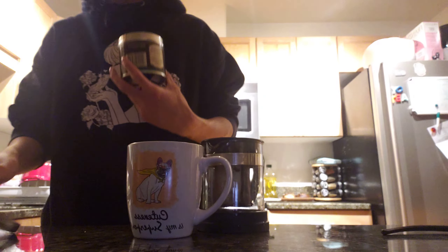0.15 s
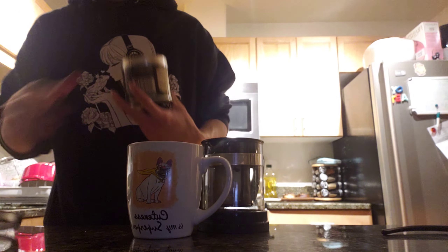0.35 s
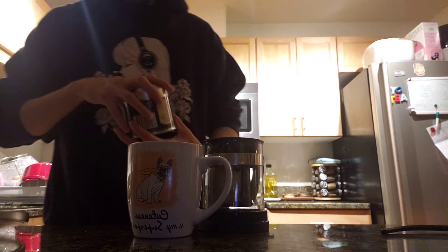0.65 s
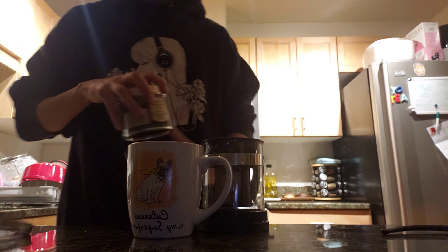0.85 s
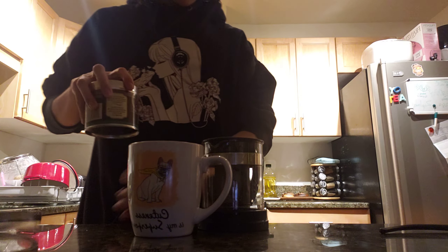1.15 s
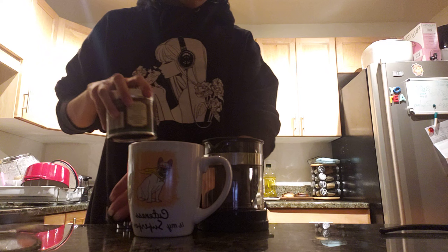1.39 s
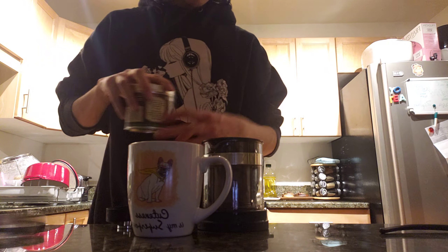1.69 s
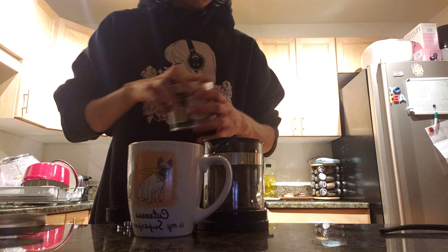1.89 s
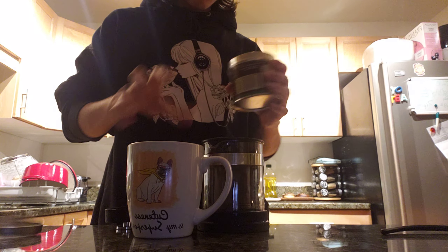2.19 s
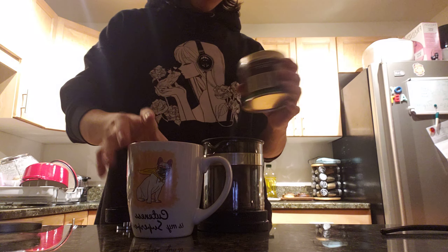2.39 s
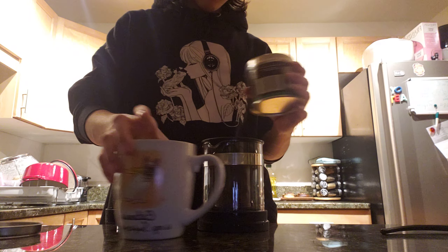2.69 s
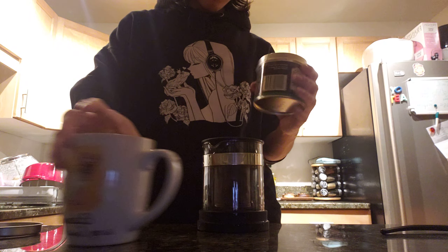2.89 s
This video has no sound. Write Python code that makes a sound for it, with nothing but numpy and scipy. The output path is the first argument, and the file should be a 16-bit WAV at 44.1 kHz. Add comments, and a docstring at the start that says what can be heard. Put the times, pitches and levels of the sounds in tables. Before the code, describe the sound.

A tin's thin metal lid hits a stone counter at 0.15 seconds with a bright clank, bounces and lands again at 0.2. It wobbles on its rim, slapping about seven times a second, then faster, chattering flat by 2.8. Faint hollow knocks come near 0.6, dull bumps and a thin rustle around 1.3-1.45. From 2.7 a dragged mug moans with a faint squeak. Close, slightly left, small lively kitchen.

```python
"""First a tin's metal lid drops on a stone kitchen counter and bounces once, near the left microphone.
It wobbles on its rim ever faster until it chatters flat: random tiny impacts ring a thin metal sheet.
Meanwhile something is set down: dull bumps and thin rustles of shaped noise, hollow knocks of sine.
At the end a dragged mug sings in wavering tones, with a thin squeak of its foot.
All this is in a small room, whose echoes are decaying noise, over a quiet background of soft noise."""
import sys
import numpy as np
from scipy import signal
from scipy.fft import rfft, irfft, next_fast_len
from scipy.io import wavfile
from scipy.ndimage import uniform_filter1d, map_coordinates

SR = 44100
rng = np.random.default_rng(int(sys.argv[2]) if len(sys.argv) > 2 else 0)


def unload_audio(sound):
    """Save the sound as a 16-bit wav file, at the path given as the first command line argument."""
    columns = np.transpose(np.atleast_2d(sound))
    # keep every value between -1 and 1, then stretch to whole-number steps
    steps = np.round(np.clip(columns, -1, 1) * 32767)
    wavfile.write(sys.argv[1], SR, steps.astype(np.int16))


N = 134505
T = np.arange(N) / SR  # time of each sample [s]


def amp(db):
    """Decibels to an amplitude factor."""
    return 10 ** (np.asarray(db) / 20)


def unit(x):
    """Scale to an rms of 1."""
    return x / np.sqrt(np.mean(x ** 2) + 1e-20)


def along(points, hz):
    """Read (pitch [Hz], value) points on a logarithmic pitch axis."""
    point_hz, value = np.transpose(points)
    return np.interp(np.log(hz + 1), np.log(point_hz + 1), value)


def curve(rows):
    """Gain per sample from (time [s], level [dB]) points, practically silent outside them."""
    return amp(np.interp(T, *np.transpose(rows), left=-120, right=-120))


def waver(rate):
    """A smooth random curve through `rate` random points per second."""
    return map_coordinates(rng.standard_normal(int(N * rate / SR) + 4), [T * rate])


def through(x, response):
    """What comes out when x excites something with this response."""
    return signal.fftconvolve(x, response)[:N]


def colour(x, points, size=4096):
    """Filter with the given spectrum and unit energy; it never sounds ahead of its input."""
    cepstrum = irfft(np.log(amp(along(points, np.fft.rfftfreq(size, 1 / SR)))))
    # folding the second half onto the first makes the filter minimum phase
    cepstrum[1:size // 2] *= 2
    cepstrum[size // 2 + 1:] = 0
    response = irfft(np.exp(rfft(cepstrum)))
    return through(x, response / np.linalg.norm(response))


def fade(t, t60):
    """Exponential decay that falls 60 dB in t60 seconds."""
    return np.exp(-np.log(1000) * np.maximum(t, 0) / t60)


def burst(start, rise, hold, t60):
    """Attack, hold and release, all in seconds."""
    return np.clip((T - start) / rise, 0, 1) * fade(T - start - hold, t60)


def mode(hz, t60):
    """A damped vibration of unit energy with a soft start, at most a second long."""
    tone = np.sin(2 * np.pi * hz * T) * fade(T, t60)
    response = (tone * (1 - np.exp(-T * hz)))[:SR]
    return response / np.linalg.norm(response)


def width_t60(width_hz):
    """Decay time of a mode from the width of its resonance: wide ones die faster."""
    return np.log(1000) / (np.pi * width_hz)


def contacts(rate, spread_db):
    """Random tiny impacts of uneven size, `rate` per second on average, rms 1."""
    hits = (rng.random(N) < rate / SR) * rng.choice([-1, 1], N)
    size = amp(spread_db * np.clip(rng.standard_normal(N), -2, 2))
    return unit(hits * size)


def place(x, lead_s, pan_db):
    """A source that reaches the left microphone earlier and louder."""
    m = next_fast_len(N + 4096)
    side = np.array([[1], [-1]])  # left, right: each takes half the lead
    shift = np.exp(1j * np.pi * side * lead_s * np.fft.rfftfreq(m, 1 / SR))
    return irfft(rfft(x, m) * shift, m)[:, :N] * amp(side * pan_db)


# spectrum of the quiet background: (pitch [Hz], relative level [dB])
AIR_COLOUR = [(25, -27), (60, -12), (130, -6), (290, 6), (420, -3.5), (620, -8.5), (1100, -27.5),
              (4000, -22), (8000, -36), (16000, -37)]
AIR_DB = -64.5


def background():
    """Soft coloured noise, partly shared between the microphones."""
    common = rng.standard_normal(N)
    ears = [colour(common + 0.78 * rng.standard_normal(N), AIR_COLOUR) for _ in range(2)]
    return amp(AIR_DB) * np.array(ears)


# how long the room rings at each pitch: (pitch [Hz], time to fall 60 dB [s])
ROOM_DECAY = [(150, 0.17), (1000, 0.88), (4000, 0.43), (8000, 0.3), (15000, 0.37)]
ROOM_DB, WALLS_DB = -6.5, -9  # diffuse tail, early echoes


def room(x):
    """Nearby cabinets return ten early echoes, and the kitchen's diffuse tail swells in and decays."""
    hz, t, noise = signal.stft(rng.standard_normal(SR * 3 // 4), SR, nperseg=256)
    decay = fade(t, along(ROOM_DECAY, hz)[:, None])
    tail = signal.istft(noise * decay, SR, nperseg=256)[1]
    tail *= np.clip(T[:len(tail)] / .015, 0, 1)
    walls = np.zeros(len(tail))
    walls[(rng.uniform(.002, .025, size=10) * SR).astype(int)] = rng.choice([-1, 1], size=10)
    tail = amp(ROOM_DB) * tail / np.linalg.norm(tail)
    return through(x, tail + amp(WALLS_DB) * walls / np.linalg.norm(walls))


# dull bumps on the counter: (time [s], level [dB], time to fall 60 dB [s])
BUMPS = [(1.298, -39.5, 0.076), (1.33, -39.5, 0.16), (1.44, -47.5, 0.22)]
# their spectrum: (pitch [Hz], relative level [dB])
BUMP_COLOUR = [(25, -33), (45, -9), (62, 6), (120, 1.5), (250, -2), (700, 0.5), (3000, -23), (9000, -42)]


def bumps():
    """Short noise bursts, mostly low: something is set down on the counter."""
    push = sum(amp(db) * burst(s, 0.0026, 0.0014, t60) for s, db, t60 in BUMPS)
    return colour(push * rng.standard_normal(N), BUMP_COLOUR)


# soft hollow knocks of the tin in the hands: (time [s], pitch [Hz], level [dB])
KNOCKS = [(0.577, 158, -49.5), (0.701, 162, -46)]


def knocks():
    """The hollow tin answers each knock with one low, quickly fading tone."""
    return sum(amp(db) * burst(s, 0.0036, 0.0045, 0.12) * np.sin(2 * np.pi * hz * (T - s))
               for s, hz, db in KNOCKS)


# thin high rustles: (time [s], level [dB], time to fall 60 dB [s])
RUSTLES = [(1.33, -57, 0.11), (1.439, -40, 0.11), (1.889, -52, 0.028)]
# their spectrum: (pitch [Hz], relative level [dB])
RUSTLE_COLOUR = [(3000, -50), (9000, -15), (10500, -2), (12300, 0), (13800, -9), (16000, -22)]


def rustles():
    """Bursts of many tiny impacts, filtered to leave the high treble."""
    strength = sum(amp(db) * burst(s, 0.0029, 0.021, t60) for s, db, t60 in RUSTLES)
    return colour(strength * contacts(2000, 5.1), RUSTLE_COLOUR)


MUG_STEADY = .55  # steady part of each main ring, beside its random part


def wavering_ring(phase, width_hz):
    """A tone whose strength and phase wander at random; phase counts in turns."""
    wander = waver(width_hz * 2) * .5 + .5j * waver(width_hz * 2)
    return unit(np.real((MUG_STEADY + wander) * np.exp(2j * np.pi * phase)))


# the drag: (time [s], main ring's pitch [Hz], main level [dB], lower ring's level [dB]),
# levels relative to each other
DRAG = [(2.7, 696, -70, -73), (2.731, 704, -42.5, -60), (2.755, 669.4, -39, -57), (2.818, 672, -45, -53),
        (2.849, 694, -40, -42), (2.893, 690.5, -39, -63), (2.925, 693, -40, -46.5), (2.968, 702, -57, -45),
        (2.996, 711, -38, -50), (3.05, 707, -58, -65)]
# the mug's weaker modes: (pitch [Hz], width [Hz], relative level [dB])
MUG_MODES = [(648, 136, 11), (898, 18, 8), (960, 120, 7)]
# thin squeak of the mug's foot: (time [s], level [dB])
SQUEAK = [(2.8, -68), (2.91, -64), (3.05, -72.5)]
SLIPS_PER_S, DRAG_DB, MUG_SIDE_DB, MUG_JUDDER_DB = 580, -4, -6, 1.2
MUG_LOW_HZ, MUG_WIDTH_HZ = 373, 49
SQUEAK_HZ, SQUEAK_WIDTH_HZ = 11900, 230


def mug():
    """The mug's foot sticks and slips on the stone; its two main rings swell and fade separately."""
    s, hz, main_db, low_db = np.transpose(DRAG)
    body = sum(amp(db) * mode(f, width_t60(width)) for f, width, db in MUG_MODES)
    slips = unit(through(contacts(SLIPS_PER_S, 1.9), body))
    main_phase = np.cumsum(np.interp(T, s, hz)) / SR
    main = wavering_ring(main_phase, MUG_WIDTH_HZ) + amp(MUG_SIDE_DB) * slips
    low = wavering_ring(MUG_LOW_HZ * T, MUG_WIDTH_HZ)
    both = main * curve(np.c_[s, main_db]) + low * curve(np.c_[s, low_db])
    squeak_mode = mode(SQUEAK_HZ, width_t60(SQUEAK_WIDTH_HZ))
    squeak = curve(SQUEAK) * unit(through(rng.standard_normal(N), squeak_mode))
    judder = amp(DRAG_DB + MUG_JUDDER_DB * waver(90))
    return place(judder * both + squeak, .0001, 0.62)


HUM_HZ, HUM_DB = 215.5, -64


def hum():
    """A low ring under the rolling lid: noise through one resonance."""
    ring = unit(through(rng.standard_normal(N), mode(HUM_HZ, 0.17)))
    return amp(HUM_DB) * ring * burst(LANDINGS[0][0], 0.024, 2.47, 2.7)


SHEET_WIDTH = .65  # part of the sheet's noise that differs between the microphones


def wide():
    """Noise for the dense sheet modes, partly shared between the microphones."""
    common = np.sqrt(1 - SHEET_WIDTH ** 2) * rng.standard_normal(N)
    return common + SHEET_WIDTH * rng.standard_normal((2, N))


def shimmer(force, t60, length):
    """The sheet's dense short ring: noise that follows the decaying energy of the force."""
    decay = fade(T[:length], t60) ** 2
    energy = np.abs(through(force ** 2, decay / decay.sum()))
    return np.sqrt(energy) * wide()


# the lid's long modes: (pitch [Hz], relative level [dB], time to fall 60 dB [s])
LID_MODES = [(610, -28, .3), (700, -28, .3), (884, -23, .25), (1185, -30, .22), (1912, -13.8, .23),
             (2420, -15.5, .55), (2769, -16.5, .14), (2885, -16, .19), (3280, -20, .14), (3466, -13, .2),
             (3732, -19.5, .15), (4280, -17, .067), (4528, -19.5, .07)]
RING_WAVER_PER_S, RING_BEND_RAD, RING_WAVER_DB = 35, .42, 2.5


def ringing(force):
    """Long modes, each wavering in phase and level as the contact point travels round the rim."""
    total = np.zeros(N)
    for hz, db, t60 in LID_MODES:
        ring = signal.hilbert(through(force, mode(hz, t60)), next_fast_len(N))[:N]
        level = amp(db + RING_WAVER_DB * waver(RING_WAVER_PER_S))
        bend = np.exp(1j * RING_BEND_RAD * waver(RING_WAVER_PER_S))
        total += level * np.real(ring * bend)
    return total


# single sharp rim taps, mostly as the lid settles: (time [s], relative strength [dB])
TAPS = [(0.579, -15), (0.6221, -5.5), (.7265, -15), (.975, -12), (1.8022, -10.5), (1.8445, -15.5),
        (1.888, -6), (1.9985, -10), (2.0185, -13.5), (2.0716, -9.5), (2.0952, -8.5), (2.12, -9.5),
        (2.163, -14.5), (2.194, -11.5), (2.2869, -13.5), (2.3517, -10.5), (2.3877, -7), (2.4137, -14),
        (2.4322, -8.5), (2.4618, -2), (2.475, -5), (2.5187, -6.5), (2.541, -8), (2.5536, 1.5),
        (2.576, -7.5), (2.6036, -10.5), (2.627, 0.5), (2.649, -7.5), (2.667, -7), (2.695, 2), (2.7294, -5),
        (2.7678, -8)]


def tap_pulses():
    """Each tap is one very short push on the sheet."""
    taps = np.zeros(N)
    for s, db in TAPS:
        taps[round(s * SR)] = amp(db)
    return taps


# spectrum of a tap: (pitch [Hz], relative level [dB])
TAP_COLOUR = [(40, -45), (900, -17.5), (2000, -24.5), (2750, -9), (3600, -15.5), (4520, 6), (5000, -3),
              (7100, -21.5), (11400, -20.5), (16000, -31.5)]
TAP_DB, TAP_T60_S, TAP_RING_DB = -4.5, 0.05, 5.5  # the last sets the ring against the bare click


def ticks(taps):
    """Each sharp tap is a bare click and a brief bright ring of the sheet."""
    ring = shimmer(taps, TAP_T60_S, SR // 8)
    return amp(TAP_DB) * np.array([colour(taps + amp(TAP_RING_DB) * ear, TAP_COLOUR) for ear in ring])


PATCHY_DB = 3.5


def patchy(x):
    """Each spot on the rim stresses other overtones: a random gain over pitch and time."""
    z = signal.stft(x, nperseg=256)[2]
    field = uniform_filter1d(rng.standard_normal(z.shape[1:]), size=2, axis=0)  # over pitch
    field = uniform_filter1d(field, size=12, axis=1)  # over time
    gain = amp(PATCHY_DB * (unit(field) - 0.12))
    return signal.istft(z * gain, nperseg=256)[1][:, :N]


# the lid's colour while tilted steeply: (pitch [Hz], relative level [dB])
STEEP_COLOUR = [(40, -42), (300, -22.5), (500, -37.5), (900, -15), (1400, -21), (1900, -1.5), (2100, -15.5),
                (2580, -2.5), (3100, -10), (3700, -8.5), (4400, -2.5), (5100, -0.5), (5700, -16.5),
                (6300, -9), (7100, -38.5), (8200, -16), (9700, -31.5), (13500, -25.5), (14800, -49),
                (16000, -22)]
# and when nearly flat: (pitch [Hz], relative level [dB])
FLAT_COLOUR = [(40, -45), (300, -22.5), (500, -29.5), (900, -15.5), (1400, -17.5), (1900, -5), (2100, -19),
               (2600, -2), (2850, -3), (3100, -11.5), (3700, -11.5), (4400, 1), (5100, -2.5), (5700, -19),
               (6300, -11.5), (7100, -34), (8200, -17), (9700, -31), (11400, -19), (13500, -29),
               (14800, -27.5), (16000, -46)]
FLATTEN_START_S, FLATTEN_END_S = 1.1, 2.3
SHEET_T60_S, CRACK = .025, .58  # CRACK: part of bare contact beside the sheet's ring


def clatter(force):
    """Bare contacts and the sheet's dense ring, changing colour as the lid flattens."""
    ring = shimmer(force, SHEET_T60_S, SR // 4)
    sheet = patchy(CRACK * force + np.sqrt(1 - CRACK ** 2) * ring)
    flat = np.clip((T - FLATTEN_START_S) / (FLATTEN_END_S - FLATTEN_START_S), 0, 1)
    return np.array([(1 - flat) * colour(ear, STEEP_COLOUR) + flat * colour(ear, FLAT_COLOUR)
                     for ear in sheet])


# once a turn the rim slaps down: (time [s], relative level [dB], time to fall 60 dB [s])
WOBBLES = [(.302, -32, 0.068), (0.458, -30.5, 0.15), (0.611, -26, 0.042), (0.7589, -26.5, 0.017),
           (0.901, -25, 0.03), (1.035, -25.5, 0.053), (1.1684, -26.5, 0.04), (1.296, -29, 0.16),
           (1.422, -29.5, 0.1), (1.5442, -29, 0.044), (1.66, -30, 0.072), (1.776, -33, 0.06),
           (1.888, -34.5, 0.16), (1.995, -35.5, 0.04), (2.094, -33.5, 0.039), (2.193, -32.5, 0.044),
           (2.2865, -38, 0.087)]
# force of the rim rolling on the stone: (time [s], relative level [dB])
ROLL = [(.2, -92), (.225, -29), (.29, -44.5), (.39, -46.5), (.55, -47), (.68, -43), (.96, -40), (1.12, -48),
        (1.22, -39.5), (1.5, -41), (1.9, -40), (2.68, -38), (2.76, -40.5), (2.81, -81)]
WOBBLE_RISE_S, WOBBLE_HOLD_S = .003, .012
CONTACTS_PER_S, CONTACT_SPREAD_DB = 2500, 4
ROLL_TICKS_PER_S, ROLL_SPREAD_DB, ROLL_WAVER_DB = 380, 3.5, 0.5
LIFT_DB, LIFT_LEAD_S, LIFT_WIDTH_S = -4, 0.042, 0.011


def rim_force():
    """Slaps and rolling are random contacts; the rim unloads shortly before each slap."""
    slaps = sum(amp(db) * burst(s, WOBBLE_RISE_S, WOBBLE_HOLD_S, t60) for s, db, t60 in WOBBLES)
    lift = sum(np.exp(-((T - s + LIFT_LEAD_S) / LIFT_WIDTH_S) ** 2) for s, _, _ in WOBBLES)
    rolling = curve(ROLL) * amp(ROLL_WAVER_DB * waver(38.77) + LIFT_DB * lift)
    slap_force = slaps * contacts(CONTACTS_PER_S, CONTACT_SPREAD_DB)
    return slap_force + rolling * contacts(ROLL_TICKS_PER_S, ROLL_SPREAD_DB)


# the lid hits edge first, its far side follows; it bounces and lands again:
# (time [s], relative level [dB])
LANDINGS = [(.156, -10.5), (0.1603, -20), (0.1835, -31), (0.2018, -10), (.207, -19), (0.2195, -23),
            (.2255, -23)]
LANDING_T60_S, LANDING_HOLD_S = 0.033, 0.0013


def landing_strength():
    """Each landing strikes abruptly and dies away fast."""
    return sum(amp(db) * burst(s, 0.00042, LANDING_HOLD_S, LANDING_T60_S) for s, db in LANDINGS)


# spectrum of a landing: (pitch [Hz], relative level [dB])
LANDING_COLOUR = [(40, -49.5), (150, -25), (900, -18.5), (1400, -24.5), (1900, 1.5), (2100, -17),
                  (2420, -1.5), (2950, -19.5), (3330, 7), (3750, -21.5), (4300, 1), (5200, -4.5),
                  (7100, -22.5), (8200, -3), (9200, -21.5), (10700, -18.5), (13400, -28), (14600, -24),
                  (16000, -27.5)]
LANDING_DB = -3.5


def crash(fall):
    """A landing shakes all the dense sheet modes at once: coloured noise."""
    return amp(LANDING_DB) * np.array([colour(fall * ear, LANDING_COLOUR) for ear in wide()])


CLANK_HZ, CLANK_BEND_RAD, CLANK_DB = 3394, 0.37, -1


def clank(fall):
    """The panel mode that a landing drives hardest: a tone with a wavering phase."""
    tone = unit(np.sin(2 * np.pi * CLANK_HZ * T + CLANK_BEND_RAD * waver(200)))
    return amp(CLANK_DB) * fall * tone


LID_LEAD_S, CLANK_LEAD_S, LID_PAN_DB = 0.0002851, .00018, 2.1


def lid():
    """Landings, rim slaps, rolling and taps all ring the same thin sheet."""
    fall = landing_strength()
    blows = fall * contacts(8100, 6.0)
    force = rim_force()
    taps = tap_pulses()
    ring = ringing(force + amp(-4) * taps + amp(-6.5) * blows)
    sheet = clatter(force) + ticks(taps) + ring + crash(fall)
    return place(sheet, LID_LEAD_S, LID_PAN_DB) + place(clank(fall), CLANK_LEAD_S, LID_PAN_DB) + hum()


def scene():
    """The sources in the kitchen, with its echoes, over its background."""
    near = bumps() + knocks() + rustles() + mug() + lid()
    echoes = np.array([room(near.mean(0)) for _ in near])
    return background() + echoes + near


TOP_HZ = 16000


def record(dry):
    """Nothing is kept above the band limit."""
    m = next_fast_len(N + SR // 2)
    keep = np.fft.rfftfreq(m, 1 / SR) < TOP_HZ
    return irfft(rfft(dry, m) * keep, m)[:, :N]


dry = scene()
out = record(dry)
unload_audio(out)
```